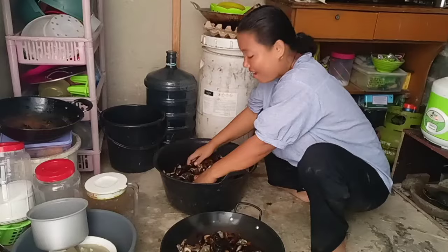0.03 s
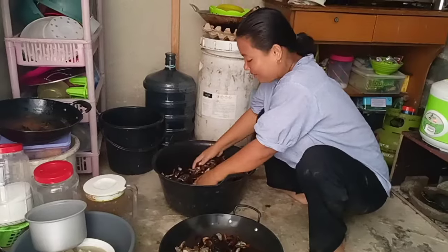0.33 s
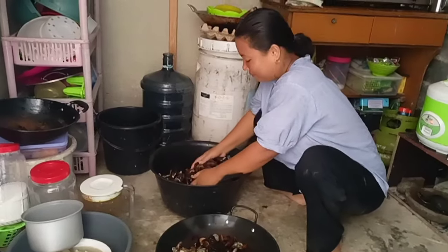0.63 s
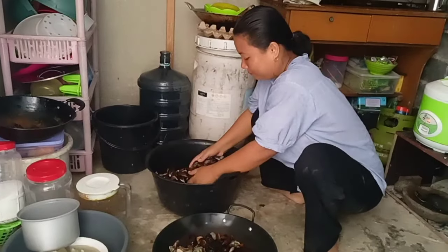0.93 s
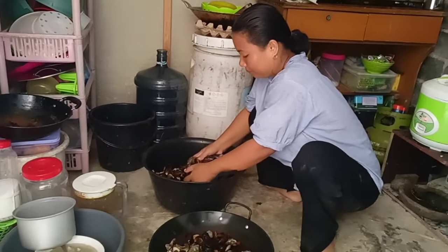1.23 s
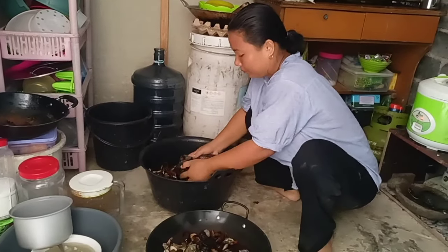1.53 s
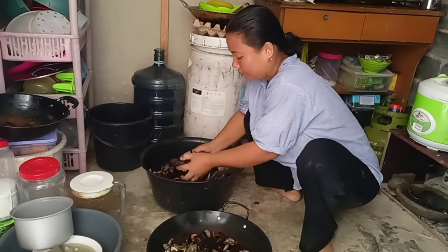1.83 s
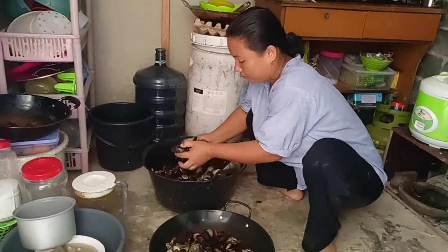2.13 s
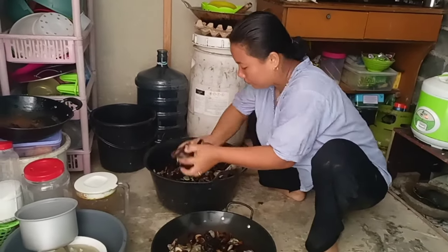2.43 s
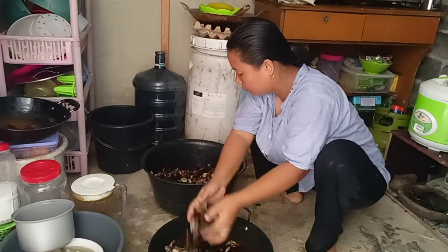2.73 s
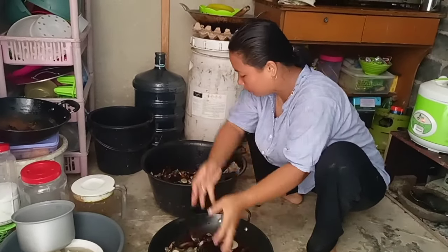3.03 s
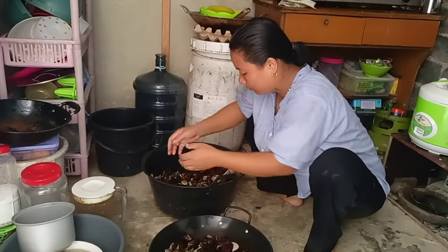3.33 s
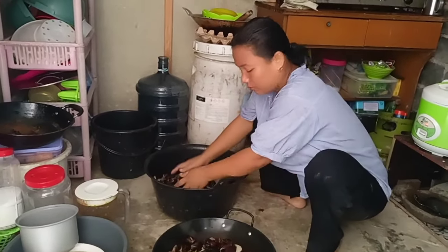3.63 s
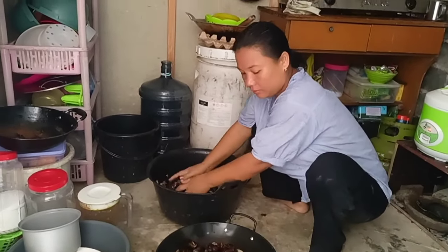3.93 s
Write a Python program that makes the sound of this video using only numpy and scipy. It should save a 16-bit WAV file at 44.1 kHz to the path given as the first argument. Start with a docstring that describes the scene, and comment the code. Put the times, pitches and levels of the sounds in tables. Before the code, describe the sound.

Hard shells rattle and crunch as hands stir them in a plastic basin with hollow knocks. A handful clatters loudly into a wok, then the stirring resumes. A low hum lies underneath in the small kitchen.

```python
"""Shellfish rattle over the hollow knocking of a plastic basin as two hands stir them; a handful
clatters into a wok, then the hands dig in again. Each of hundreds of small impacts excites the damped
modes of a shell or a vessel, and the hard kitchen walls reflect the sound. A low throb, perhaps
a far engine, and a thin hiss lie underneath; an automatic gain control ducks at the clatter."""
import sys
import numpy as np
from scipy import signal
from scipy.io import wavfile
from scipy.ndimage import uniform_filter1d

SR = 44100
rng = np.random.default_rng(int(sys.argv[2]) if len(sys.argv) > 2 else 0)


def persist_wave(psi):
    """Save psi, clipped to +-1, as 16-bit WAV."""
    counts = np.round(np.clip(psi, -1, 1) * 32767).astype(np.int16)
    wavfile.write(sys.argv[1], SR, np.atleast_2d(counts).T)


N = 176400
TIME = np.arange(N) / SR

# background noise spectra (f/Hz, relative level/dB)
THROB_SPECTRUM = [(28, -51), (42, -20), (60, -25), (82, 5.5), (108, -1.5), (150, -0.5), (170, -17.5),
                  (192, -2), (280, -13.5), (400, -11), (700, -25), (1300, -51.5)]
HISS_SPECTRUM = [(100, -2), (500, 4.5), (1200, -2.5), (6000, -9.5), (8400, -18), (9000, -5.5), (9800, -9.5),
                 (10400, -17), (12500, -27), (16000, -24)]
# wavering tones in the rumble (f/Hz, level/dB)
HUM_TONES = [(84, -47.5), (107.7, -39.5), (131, -44.5), (154, -47)]
# reverberation time of the kitchen (f/Hz, T60/s)
ROOM_DECAY = [(100, 0.27), (500, 0.36), (3500, 0.32), (6000, 0.31), (10000, 0.22), (16000, 0.25)]
# spectra of shell collisions (f/Hz, relative level/dB)
RATTLE_SPECTRUM = [(500, -36), (950, -16), (1200, -12.5), (1550, -3.5), (2100, -8.5), (2600, -2.5),
                   (3100, -4), (3650, -9), (4700, -10.5), (6000, -8), (9000, -27), (16000, -38)]
CRUNCH_SPECTRUM = [(1000, -32), (3500, -13.5), (4800, -6), (5850, -0.5), (6700, -9), (8000, -11),
                   (10400, -22), (12400, -23.5), (16000, -27.5)]
CLATTER_SPECTRUM = [(530, -24), (900, -12), (1250, -13), (1700, -6.5), (2150, -12.5), (3000, -7.5),
                    (5000, -6.5), (6200, -4), (7500, -16.5), (9400, -20.5), (10400, -24), (16000, -30)]
CRACK_SPECTRUM = [(400, -25), (1600, 4), (3000, 11.5), (6000, 8.5), (9000, -6), (16000, -17)]
# normal modes of the vessels (f/Hz, relative level/dB, T60/s)
BASIN_MODES = [(383.4, -8.5, 0.075), (474, -5.5, 0.1), (619, -10, 0.11), (678.3, -5.5, 0.11),
               (820, 7.5, 0.009)]
WOK_MODES = [(407, -14.5, 0.044), (495, -1.5, 0.054), (690, 6.5, 0.012), (850, 2, 0.023), (3040, 9, 0.019),
             (3820, -6, 0.23)]
# single knocks of shells against the basin (t/s, level/dB, f/Hz)
BASIN_KNOCKS = [(0.491, -18, 629), (0.9065, -20.5, 658), (0.926, -23.5, 816), (3.912, -24, 676)]
# single sharp shell clacks (t/s, tick level/dB, tick f/Hz, crack level/dB)
SHELL_CLACKS = [(0.2145, -10, 2850, -18), (0.4759, -6, 5700, -1), (0.538, -2, 3390, -16),
                (0.6275, -5, 5950, -3), (0.696, -3, 5430, -5), (0.752, -5, 3650, -13),
                (0.9063, -14, 4370, -14), (0.9852, -18, 3080, -15), (1.2406, -12, 5720, -10),
                (1.5604, -13, 5800, -3), (1.685, -11, 2900, -21), (1.796, -8, 3150, -14),
                (1.822, -5, 2700, -23), (2.0665, -16, 6020, -7), (2.124, -10, 5750, -3),
                (2.331, 1, 5720, -14), (2.668, -22, 2770, -14), (2.8, -10, 6000, 0), (2.827, -1, 2920, -8),
                (2.8613, 12, 2920, 4), (2.897, 4, 9300, -6), (2.9424, 9, 5000, -5), (3.0916, 0, 4900, -3),
                (3.307, -10.5, 4500, -19), (3.6134, -19, 1750, -12)]
# envelope of the handful landing in the wok (t/s, shell level/dB, pan level/dB)
LANDING = [(2.797, -21.5, -42), (2.84, -15, -9), (2.865, -9, -8), (2.94, -12.5, -26), (2.97, -19, -24),
           (3.07, -25, -21), (3.10, -18, -23), (3.14, -29.5, -29.5), (3.19, -25, -26), (3.22, -43, -40),
           (3.28, -34.5, -32)]
# envelope of shells shifting between pushes (t/s, level/dB)
SHELL_SHIFTING = [(0, -35), (.33, -33), (.6, -25.5), (.87, -38.5), (1.15, -36), (1.43, -35.5), (1.7, -27),
                  (2.2, -41.5), (2.35, -32), (2.6, -55), (3.5, -58), (3.8, -53)]
# pushes of the hands (start t/s, duration/s, rattle level/dB, crunch level/dB, basin level/dB)
HAND_PUSHES = [(0.057, 0.092, -26, -36, -28.5), (0.191, 0.054, -22.5, -39, -28),
               (0.377, 0.05, -24.5, -26.5, -31.5), (0.477, 0.048, -16.5, -22, -22),
               (0.552, 0.128, -46, -27.5, -29.5), (0.696, 0.12, -28.5, -33, -39.5),
               (0.897, 0.031, -25, -38, -30), (0.984, 0.047, -31.5, -32, -36),
               (1.213, 0.071, -26, -29, -37), (1.515, 0.056, -27.5, -36, -35),
               (1.559, 0.03, -23.5, -21, -35), (1.731, 0.028, -24, -23.5, -35.5),
               (1.78, 0.13, -29, -36, -51), (1.911, 0.14, -30, -28.5, -41.5),
               (2.045, 0.057, -29.5, -26, -45), (2.105, 0.11, -28, -25.5, -40.5),
               (2.384, 0.073, -35.5, -51, -66), (2.664, 0.28, -36, -45, -49),
               (3.588, 0.034, -30, -38, -34.5), (3.827, 0.047, -27.5, -36, -28),
               (3.896, 0.028, -32, -55, -27), (3.977, 0.026, -19, -14.5, -38)]

THROB_DB, THROB_HZ, THROB_DEPTH = -34.5, 24.17, 0.056
HUM_LINEWIDTH_HZ, HISS_DB = 4.57, -45
TAIL_DB, EARLY_DB, DIRECT_DB = -2, -7, -7
SPOT_S = 0.013  # time the impacts dwell on one spot of the heap
SHELL_T60_S, KNOCK_T60_S, CRACK_DECAY_S, TICK_LENGTH_S = 0.0043, 0.12, 0.00063, 0.002
RATTLE_HITS_PER_S, CRUNCH_HITS_PER_S, WALL_HITS_PER_S, WOK_HITS_PER_S = 520, 460, 180, 520
SHIFT_CRUNCH_DB, SHIFT_WALL_DB = -3.5, -15.5
BUILD_DB, BUILD_S = -9, 0.022  # shells start to stir before a push gives way
PUSH_ATTACK_S, PUSH_RELEASE_S = 0.017, 0.016
STIR_DB, CLATTER_DB, PAN_DB, CLACK_DB = -0.5, 6, -1.5, 2.5
CLACK_ROOM_DB, CLACK_DIRECT_DB = -2, -13
THRESHOLD_DB, DUCK_DB_PER_DB, RECOVER_DB_PER_S = -16, 0.64, 18
CUTOFF_HZ = 15900


def amp(db):
    """Amplitude ratio of a level."""
    return 10 ** (np.asarray(db) / 20)


def unit_rms(x):
    """Normalisation to unit mean power."""
    return x / np.sqrt(np.mean(x ** 2) + 1e-20)


def at_hz(points, hz):
    """Interpolation on a logarithmic frequency axis."""
    f, value = np.transpose(points)
    return np.interp(np.log(hz + 1), np.log(f + 1), value)


def envelope(rows, column=1):
    """Amplitude from levels interpolated in time; silent outside the table."""
    rows = np.array(rows)
    return amp(np.interp(TIME, rows[:, 0], rows[:, column], left=-np.inf, right=-np.inf))


def add(mix, start_s, sound):
    """Superposition of a delayed sound on the mix."""
    part = mix[round(start_s * SR):][:len(sound)]
    part += sound[:len(part)]


def colour(x, spectrum, size=4096):
    """Minimum-phase filtering, with an impulse response of unit energy."""
    log_gain = np.log(amp(at_hz(spectrum, abs(np.fft.fftfreq(size, 1 / SR)))))
    taps = np.fft.ifft(np.exp(np.conj(signal.hilbert(log_gain)))).real[:size // 2]
    return signal.fftconvolve(x, taps / np.linalg.norm(taps))[:len(x)]


def damped_mode(hz, t60, size=6000):
    """Free vibration of a damped oscillator, falling 60 dB in t60 seconds."""
    t = np.arange(size) / SR
    return np.sin(2 * np.pi * hz * t) * np.exp(-np.log(1000) * t / t60)


def background():
    """Amplitude modulation makes low noise throb and phase diffusion makes tones waver, in steady hiss."""
    beats = rng.standard_normal(N) * (1 + THROB_DEPTH * np.cos(2 * np.pi * THROB_HZ * TIME))
    rumble = amp(THROB_DB) * unit_rms(colour(beats, THROB_SPECTRUM, size=8192))
    for hz, db in HUM_TONES:
        drift = np.cumsum(rng.standard_normal(N)) * np.sqrt(2 * np.pi * HUM_LINEWIDTH_HZ / SR)
        rumble += amp(db) * unit_rms(np.sin(2 * np.pi * hz * TIME + uniform_filter1d(drift, size=2000)))
    return rumble + amp(HISS_DB) * unit_rms(colour(rng.standard_normal(N), HISS_SPECTRUM))


def room_response(size=28000, bounces=14):
    """Reverberation from one spot: early reflections off vessel and floor, and an exponential tail."""
    reflections = rng.choice([-1., 1.], size) * (rng.random(size) < .1)
    hz, t, bands = signal.stft(reflections, SR, nperseg=256)
    decay = np.exp(-np.log(1000) * t / at_hz(ROOM_DECAY, hz)[:, None])
    tail = signal.istft(bands * decay, SR, nperseg=256)[1][:size]
    tail *= np.minimum(TIME[:size] / 0.0025, 1)
    response = amp(TAIL_DB) * tail / np.linalg.norm(tail)
    delay_samples = rng.integers(70, 750, bounces)
    response[delay_samples] += amp(EARLY_DB) * rng.choice([-1, 1], bounces) / np.sqrt(bounces)
    return response


def kitchen(x, spots=5):
    """Multipath propagation: direct sound plus echoes that change as impacts move from spot to spot."""
    out = amp(DIRECT_DB) * x
    for spot in range(spots):
        away = abs((TIME / SPOT_S + spot) % spots - spots / 2)
        crossfade = np.cos(np.pi / 2 * np.minimum(away, 1))
        out += signal.fftconvolve(x * crossfade, room_response())[:N]
    return out


def impacts(per_s, spread_db, window):
    """A Poisson process of impulses with log-normal strengths, its power held roughly steady."""
    hits = (rng.random(N) < per_s / SR) * rng.choice([-1, 1], N)
    hits = hits * amp(spread_db * rng.standard_normal(N))
    power = abs(uniform_filter1d(hits ** 2, window))
    return unit_rms(hits / np.sqrt(power + 0.34 * power.mean()))


def shells(hits, count=160, modes=14, size=700):
    """Impulse excitation: each impact rings one of many shells, each with its own short-lived modes."""
    mode_hz = rng.permuted(np.linspace(600, CUTOFF_HZ, count * modes).reshape(modes, count), axis=1)
    signs = rng.choice([-1, 1], (modes, count, 1))
    ticks = (signs * damped_mode(mode_hz[..., None], SHELL_T60_S, size)).sum(0)
    ticks /= np.linalg.norm(ticks, axis=1, keepdims=True)
    struck = rng.integers(0, count, N)
    out = np.zeros(N)
    for at in np.flatnonzero(hits):
        add(out, at / SR, hits[at] * ticks[struck[at]])
    return out


def vessel(hits, modes):
    """Modal superposition: a vessel answers each impact with the sum of its damped modes."""
    knock = sum((-1) ** k * amp(db) * damped_mode(hz, t60) for k, (hz, db, t60) in enumerate(modes))
    return signal.oaconvolve(hits, knock / np.linalg.norm(knock))[:N]


def basin_knocks():
    """Resonance: bumped by a shell, the basin gives a hollow note that depends on where it is struck."""
    out = np.zeros(N)
    for start, db, hz in BASIN_KNOCKS:
        add(out, start, amp(db) * damped_mode(hz, KNOCK_T60_S))
    return out


def shell_clacks(size=1500):
    """Contact transients: a shell slips and snaps on another, with a broad crack and a pitched tick."""
    out, t = np.zeros(N), TIME[:size]
    tick_shape = np.sin(np.pi * np.minimum(t / TICK_LENGTH_S, 1) ** .5) ** 2
    for start, tick_db, hz, crack_db in SHELL_CLACKS:
        crack = colour(rng.standard_normal(size) * np.exp(-t / CRACK_DECAY_S), CRACK_SPECTRUM)
        tick = np.sin(2 * np.pi * hz * t) * tick_shape
        add(out, start, amp(tick_db) * tick + amp(crack_db) * crack / abs(crack).max())
    return amp(CLACK_DB) * out


def drop_into_wok():
    """Common excitation: the same falling shells ring the heap and the damped steel pan under it."""
    hits = impacts(WOK_HITS_PER_S, spread_db=6, window=900)
    clatter = colour(shells(hits * envelope(LANDING)), CLATTER_SPECTRUM)
    pan = vessel(hits * envelope(LANDING, column=2), WOK_MODES)
    return amp(CLATTER_DB) * clatter + amp(PAN_DB) * pan


def stir_in_basin():
    """Incoherent addition: pushes sum in power as they grind shells, crunch edges and bump the wall."""
    power = (amp([[0], [SHIFT_CRUNCH_DB], [SHIFT_WALL_DB]]) * envelope(SHELL_SHIFTING)) ** 2
    for start, length, *levels_db in HAND_PUSHES:
        t = TIME - start
        build = amp(BUILD_DB) * np.exp(np.minimum(t, 0) / BUILD_S)
        attack = np.clip(t / PUSH_ATTACK_S, 0, 1)
        release = np.exp(-np.maximum(t - length, 0) / PUSH_RELEASE_S)
        power += (amp(levels_db)[:, None] * np.maximum(build, attack) * release) ** 2
    grind, scrape, bump = np.sqrt(power)
    rattle_hits = grind * impacts(RATTLE_HITS_PER_S, spread_db=7, window=1200)
    rattle = colour(shells(rattle_hits), RATTLE_SPECTRUM)
    crunch_hits = scrape * impacts(CRUNCH_HITS_PER_S, spread_db=8, window=2000)
    crunch = colour(shells(crunch_hits), CRUNCH_SPECTRUM)
    wall_hits = bump * impacts(WALL_HITS_PER_S, spread_db=3.5, window=1200)
    return amp(STIR_DB) * (rattle + crunch + vessel(wall_hits, BASIN_MODES))


def scene():
    """Superposition at one microphone; shells that snap on top of the heap reach it more directly."""
    clacks = shell_clacks()
    sources = stir_in_basin() + drop_into_wok() + amp(CLACK_ROOM_DB) * clacks + basin_knocks()
    return (kitchen(sources) + amp(CLACK_DIRECT_DB) * clacks + background())[None]


def record(dry):
    """Dynamic compression with slow recovery, then soft saturation and a low-pass band limit."""
    power_db = 10 * np.log10(abs(uniform_filter1d(dry[0] ** 2, size=900)) + 1e-12)
    fall_db = RECOVER_DB_PER_S * TIME
    held_db = np.maximum.accumulate(power_db + fall_db) - fall_db
    over_db = np.maximum(held_db - THRESHOLD_DB, 0)
    gain = amp(-DUCK_DB_PER_DB * uniform_filter1d(over_db, size=400))
    lowpass = signal.firwin(511, CUTOFF_HZ, window=("kaiser", 9), fs=SR)
    return signal.oaconvolve(np.tanh(dry * gain), lowpass[None], "same")


dry = scene()
out = record(dry)
persist_wave(out)
```